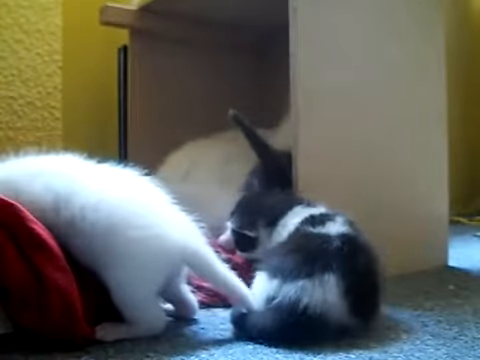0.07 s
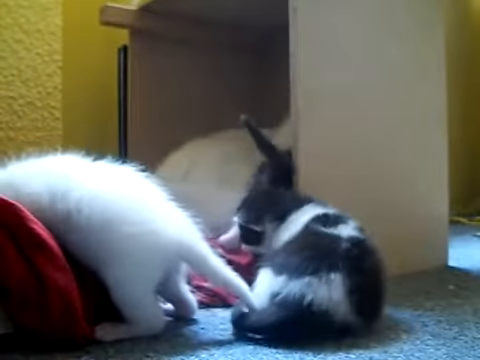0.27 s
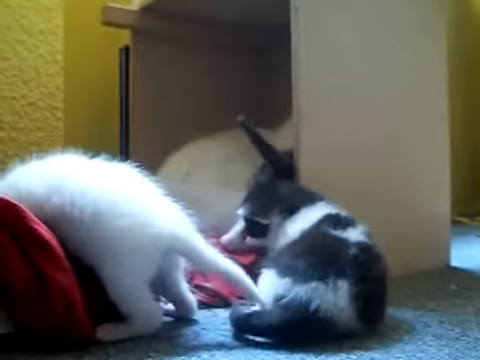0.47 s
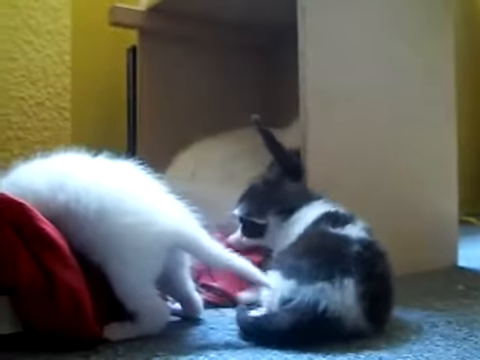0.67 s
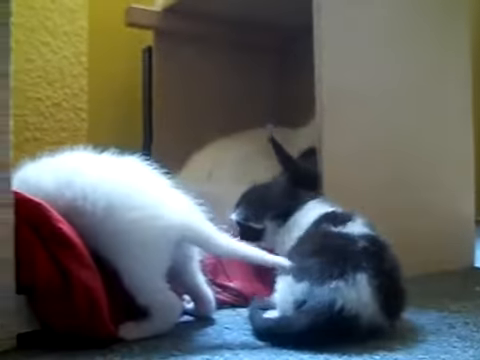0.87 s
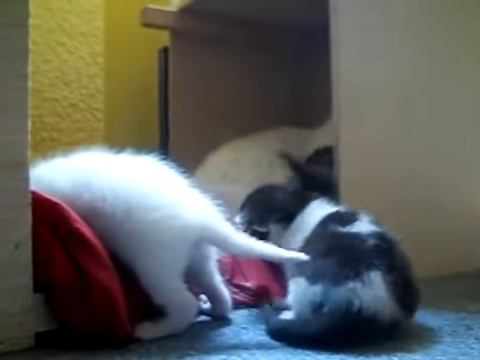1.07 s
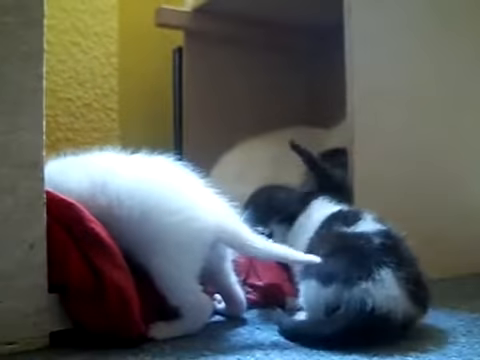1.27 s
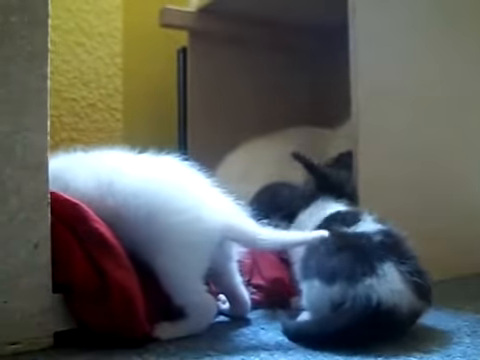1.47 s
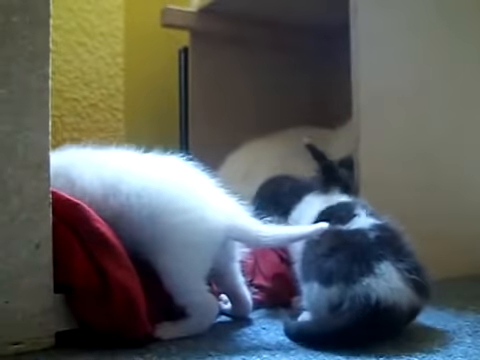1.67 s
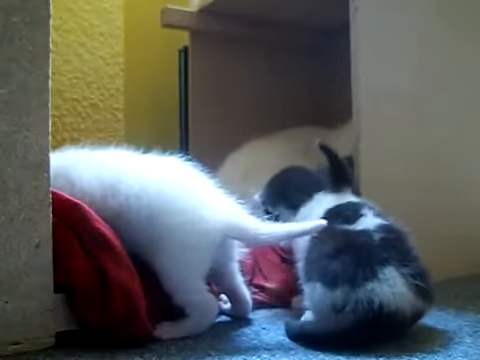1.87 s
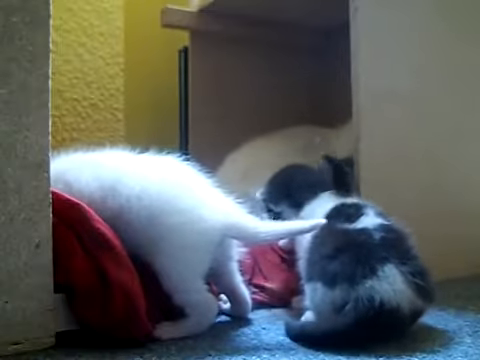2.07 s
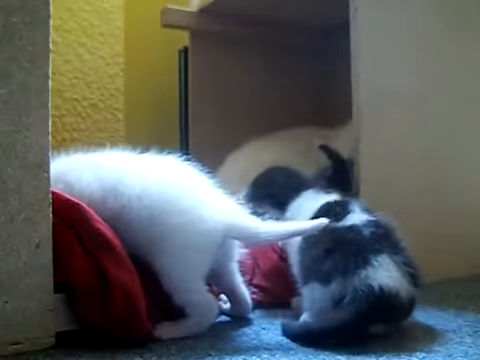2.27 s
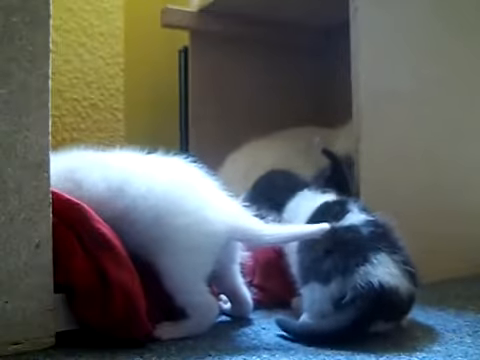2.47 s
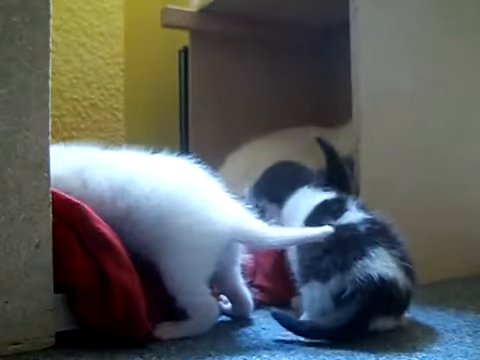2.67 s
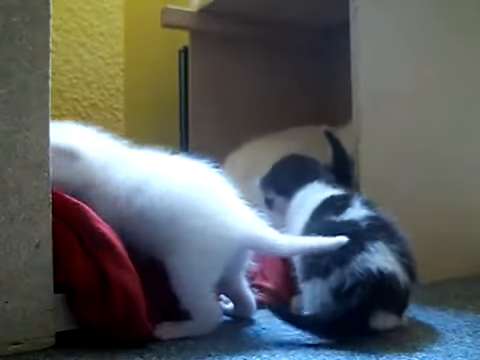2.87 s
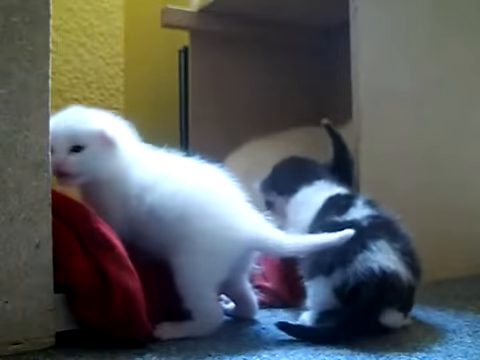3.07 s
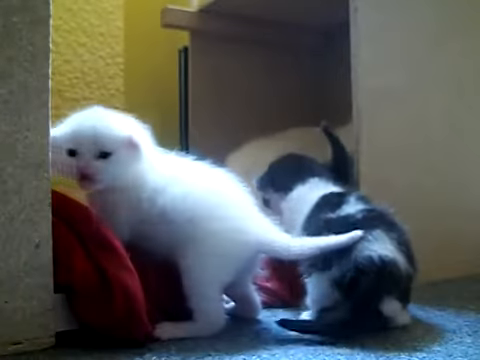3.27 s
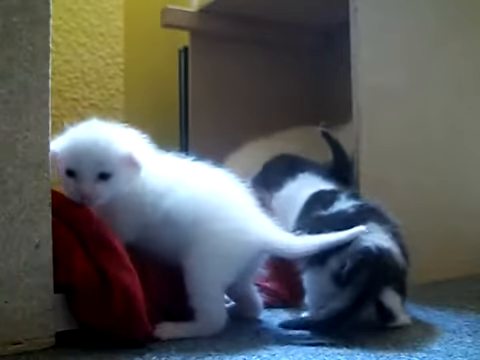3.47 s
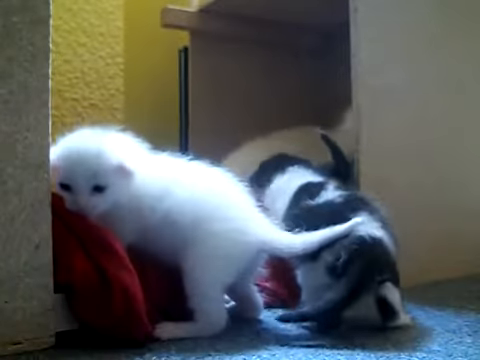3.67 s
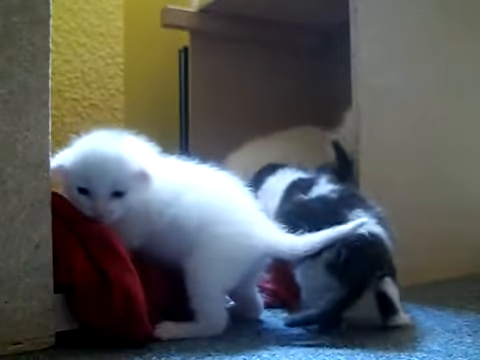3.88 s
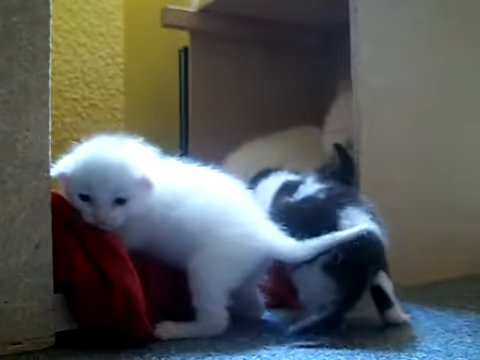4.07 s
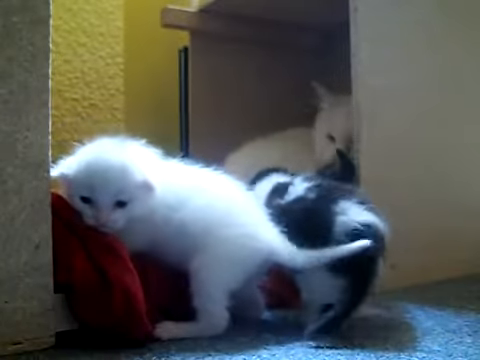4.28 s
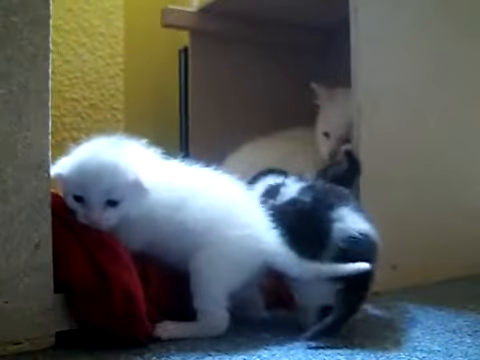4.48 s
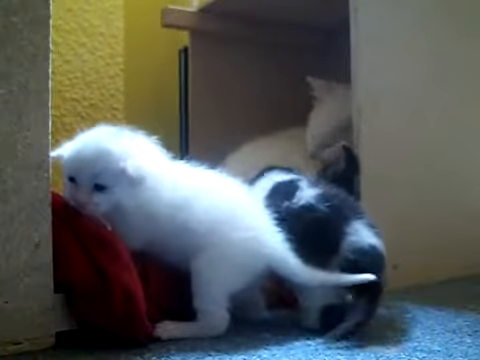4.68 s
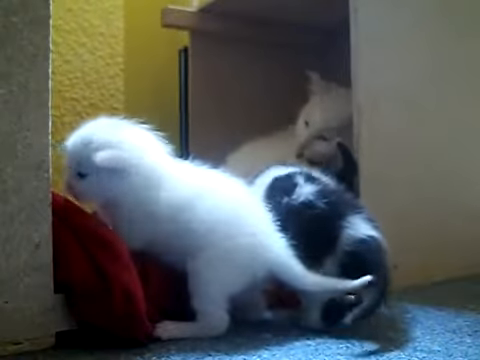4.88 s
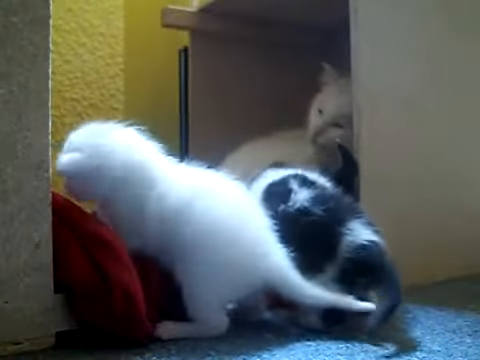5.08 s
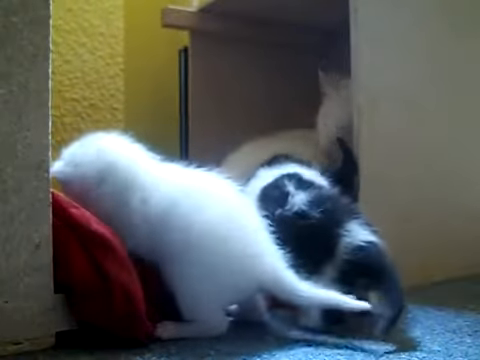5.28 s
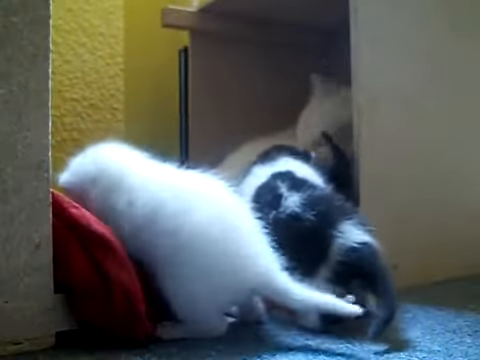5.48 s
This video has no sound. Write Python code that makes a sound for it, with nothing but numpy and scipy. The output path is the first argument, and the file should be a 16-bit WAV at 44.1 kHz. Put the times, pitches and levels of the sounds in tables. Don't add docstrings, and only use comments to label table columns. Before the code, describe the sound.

A small, dull-sounding microphone picks up kittens in a carpeted room with a short reverb. Steady hiss and an uneven low rumble run throughout, with soft handling thuds. From 0 to 1.7 s, cloth and carpet rustle in brushing strokes, with small ticks near 0.35 s and a dry snap with a thump at 0.59 s. At 1.48 s a sharp cluster of claw clicks, the loudest contact, coincides with a hoarse chirrup that climbs into a thin squeal until 1.93 s. Light ticks, scuffs and brief rustles follow from 2.05 to 2.8 s, with a barely audible peep at 2.5 s. From 2.96 to 3.64 s the main mew rises, clears, holds high and falls; a lower, rougher mew overlaps it from 3.2 to 3.5 s, and a click closes it. Then it is quiet until a small scuff at 4.64 s, a faint peep at 4.7 s and a weak low mew gliding upward from 5.1 s to the end.

```python
import sys
import numpy as np
from scipy import signal
from scipy.fft import rfft, irfft, next_fast_len
from scipy.io import wavfile
from scipy.ndimage import uniform_filter1d

SR = 44100
rng = np.random.default_rng(int(sys.argv[2]) if len(sys.argv) > 2 else 0)


def volts_from_db(level):
    exponent = np.asarray(level, float) / 20
    return 10 ** exponent


def unload_wav(signal):
    wavfile.write(
        sys.argv[1],
        SR,
        np.round(np.clip(np.atleast_2d(signal).T, -1, 1) * 32767).astype(np.int16),
    )


N = 243851
LOW_RATE_HZ = 12000

# frequency in Hz, level in dB per Hz.
HISS_TOP = [(5200, -29), (5500, -32), (5700, -36), (5860, -40), (5990, -43)]


def rms_one(x):
    return x / np.sqrt(np.mean(x ** 2) + 1e-20)


def in_time(rows, fade=0.008):
    s, *columns = np.transpose(rows)
    t = np.arange(N) / SR
    gate = np.clip(np.minimum(t - s[0], s[-1] - t) / fade + 0.5, 0, 1)
    return gate, [np.interp(t, s, column) for column in columns]


def swell(s, rise_s, fall_s):
    t = np.arange(N) / SR - s
    quarter = np.clip(np.where(t < 0, t / rise_s, t / fall_s), -1, 1)
    return np.cos(np.pi / 2 * quarter) ** 2


def drift(rate, size=N):
    r = np.exp(-2 * np.pi * rate / SR)
    lead_in = SR // 2
    noise = rng.standard_normal(size + lead_in)
    return rms_one(signal.lfilter([1], [1, -2 * r, r * r], noise)[lead_in:])


def coloured(x, points, lag=0):
    size = next_fast_len(N + 4096)
    hz = np.arange(size // 2 + 1) * SR / size
    points = np.array(points)
    gain = volts_from_db(np.interp(np.log(hz + 1), np.log(points[:, 0]), points[:, 1]))
    delay = np.exp(-2j * np.pi * hz * lag / SR)
    return irfft(rfft(x, size) * gain * delay, size)[..., :N]


def resonance(x, hz, width_hz):
    r = np.exp(-np.pi * width_hz / SR)
    poles = [1, -2 * r * np.cos(2 * np.pi * hz / SR), r * r]
    return signal.lfilter([(1 - r * r) / 2, 0, (r * r - 1) / 2], poles, x)


def hiss():
    # frequency in Hz, level in dB per Hz.
    floor_colour = [(59, -32.5), (100, -17.5), (135, -3), (329, -7), (408, -8.5), (703, -12), (2060, -16),
                    (2430, -15.5), (4130, -18), (5200, -30.5), (6760, -60), (11400, -120)]
    floor = rms_one(coloured(rng.standard_normal(N), list(floor_colour[:-3]) + list(HISS_TOP)))
    return volts_from_db(-58 + 0.8 * drift(2.4)) * floor


def steady(x):
    return x / np.sqrt(uniform_filter1d(x ** 2, size=8000) + 1e-20)


def rumble():
    # time in seconds, level in dB.
    traffic = [(0.0, -62.5), (0.44, -51), (0.63, -73), (0.72, -59), (1.08, -54), (1.15, -67), (1.52, -51.5),
               (1.59, -65), (1.63, -55), (2.11, -64.5), (2.45, -53), (2.94, -64), (3.48, -48.5),
               (3.99, -49.5), (4.43, -65), (4.7, -49.5), (5.5, -61.5), (5.53, -49.5)]
    # peak in seconds, length in seconds, thud in dB, boom in dB.
    bumps = [(0.138, 0.12, -56, -79), (0.352, 0.42, -78, -54), (0.758, 0.23, -48.5, -52.5),
             (0.919, 0.12, -52.5, -53.5), (1.128, 0.1, -61, -56.5), (1.269, 0.097, -56, -60.5),
             (1.502, 0.042, -44.5, -50.5), (2.063, 0.62, -70.5, -58.5), (2.373, 0.17, -70, -70),
             (3.41, 0.26, -56, -63.5), (3.685, .3, -53.5, -76.5), (4.1, 0.36, -61, -70.5),
             (4.885, 0.63, -66, -62.5), (5.52, 0.09, -66, -60.5)]
    thud_floor_db, boom_floor_db = -62, -63
    drone_hz, boom_hz = 56.4, 83.1

    _, (drone_db,) = in_time(traffic)
    humps = np.array([swell(s, length / 2, length / 2) for s, length, *_ in bumps])
    bump_gains = volts_from_db(np.array(bumps)[:, 2:].T) @ humps
    thud_gain, boom_gain = bump_gains + volts_from_db([[thud_floor_db], [boom_floor_db]])

    white = rng.standard_normal((3, N + SR))
    slow_band = signal.butter(2, [14, 31], "band", fs=SR, output="sos")
    thud = signal.sosfilt(slow_band, white[0])[SR:]
    drone = resonance(resonance(white[1], drone_hz, 5), drone_hz, 8)[SR:]
    boom = resonance(resonance(white[2], boom_hz, 37), boom_hz, 21)[SR:]
    return thud_gain * steady(thud) + volts_from_db(drone_db) * steady(drone) + boom_gain * steady(boom)


def shelf_hum():
    # frequency in Hz, width in Hz, level in dB.
    hz, width_hz, hum_db = (324, 25, -70)
    return rms_one(resonance(rng.standard_normal(N), hz, width_hz)) * volts_from_db(hum_db + 2 * drift(9.1))


def rustle():
    # peak in seconds, rise in seconds, fall in seconds, fibres in dB, drag in dB.
    strokes = [(.345, 0.16, .1, -60, -61.5), (0.601, 0.16, .12, -64, -57), (0.962, 0.28, 0.18, -54, -54),
               (1.09, 0.043, 0.093, -58.5, -66), (1.21, 0.29, 0.31, -58.5, -52.5),
               (1.456, 0.029, 0.059, -55, -55), (1.651, 0.088, 0.12, -55, -60.5),
               (2.07, 0.046, 0.03, -60.5, -62), (2.43, 0.052, .06, -62.5, -60),
               (4.72, 0.13, 0.38, -69, -74.5), (4.96, 0.17, 0.19, -84, -64), (5.125, 0.06, 0.08, -64, -65)]
    # frequency in Hz, level in dB per Hz.
    fibre_colour = [(530, -20.5), (900, -6.5), (1200, -2.5), (1340, 3.5), (1460, 4), (4420, 3), (5600, -35),
                    (7280, -51.5), (12300, -120)]
    # frequency in Hz, level in dB per Hz.
    drag_colour = [(71, -46), (120, -1), (290, -3), (330, 3), (464, -1.5), (1100, -8.5), (1430, -30.5),
                   (2420, -120)]

    snaps_per_s = 900 * volts_from_db(3 * drift(20))
    snap_size = volts_from_db(1.9 * np.minimum(rng.exponential(1, N), 4))
    snaps = (rng.random(N) < snaps_per_s / SR) * snap_size * rng.choice([-1, 1], N)
    friction = 0.33 * rms_one(snaps) + 0.83 * rng.standard_normal(N)
    fibre_top = [(hz, db + 17) for hz, db in HISS_TOP]
    bright = rms_one(coloured(friction, list(fibre_colour[:-3]) + fibre_top))
    dull = rms_one(coloured(friction, drag_colour))
    out = np.zeros(N)
    for s, rise_s, fall_s, bright_db, dull_db in strokes:
        out += swell(s, rise_s, fall_s) * (volts_from_db(bright_db) * bright + volts_from_db(dull_db) * dull)
    return volts_from_db(0.7 * drift(9.1)) * out


def ticks():
    # start in seconds, peak in dB, centre in Hz.
    claws = [(.297, -49, 4090), (.367, -39.5, 4770), (1.3695, -47, 3120), (1.4757, -30.5, 4340),
             (1.481, -27.5, 4010), (1.4835, -30.5, 4780), (1.4871, -31, 4500), (1.4908, -30, 5290),
             (2.2438, -34.5, 4100), (2.246, -48.5, 3930), (2.056, -48, 4880), (2.645, -44, 3200),
             (5.031, -51, 3100)]
    # start in seconds, peak in dB, centre in Hz.
    dry_snaps = [(0.341, -45.5, 1800), (0.5882, -32, 3770), (0.5868, -33, 1870), (0.587, -40.5, 1355),
                 (1.413, -36, 3540), (1.441, -41.5, 3530), (1.86, -42.5, 2620), (2.057, -41, 1770),
                 (2.646, -47, 1800), (4.64, -50.5, 1000), (2.084, -56, 1200), (2.386, -48, 2150),
                 (2.413, -44.5, 2280), (2.427, -49, 2500)]
    # start in seconds, peak in dB, centre in Hz.
    scuffs = [(.588, -48, 820), (1.619, -44, 1000), (2.069, -49, 1670), (2.257, -46, 4240),
              (2.474, -48, 4150), (2.505, -48.5, 4280), (2.7, -47, 3470), (4.72, -48.5, 3820),
              (4.77, -49.5, 3810), (2.738, -47.5, 3200), (1.484, -48.5, 190), (3.185, -55, 3360),
              (3.633, -48, 1270), (3.647, -38.5, 4430), (4.6377, -43, 3780), (4.642, -50, 1580)]
    # width as a share of the centre, decay by 60 dB in seconds.
    kinds = [
        (0.21, 0.038),
        (0.89, .008),
        (.4, .08),
    ]
    # start in seconds, peak in dB.
    thumps = [(0.276, -47), (.34, -51), (0.5859, -35), (1.4448, -42), (1.483, -57), (1.4919, -49),
              (2.058, -53), (2.085, -43), (2.649, -48), (2.738, -45.5), (2.768, -64), (4.643, -53)]
    # frequency in Hz, gain in dB.
    contact_colour = [(2500, 0), (4500, -8), (5200, -18), (5900, -32)]
    thump_hz, thump_t60_s = 340, 0.03

    size = 4400
    out, t = np.zeros(N), np.arange(size) / SR
    for rows, (share, t60_s) in zip([claws, dry_snaps, scuffs], kinds):
        for s, peak_db, hz in rows:
            puff = rng.standard_normal(size) * volts_from_db(-60 * t / max(t60_s, 0.002))
            band = resonance(resonance(puff, hz, share * hz), hz, share * hz)
            out[round(s * SR):][:size] += volts_from_db(peak_db) * band / np.abs(band).max()
    for s, peak_db in thumps:
        decay = volts_from_db(peak_db - 60 * t / thump_t60_s)
        out[round(s * SR):][:size] += decay * np.sin(2 * np.pi * thump_hz * t)
    return coloured(out, contact_colour)


def room(x):
    t60_s = 0.18
    t = np.arange(round(0.4 * SR)) / SR
    tail = rng.standard_normal(len(t)) * volts_from_db(-60 * t / t60_s) * (t > 0.004)
    return signal.fftconvolve(x, tail / np.sqrt(np.sum(tail ** 2)))[:N]


def mew(rows, throat_db, hoarse, closing_db=0):
    throat_hz = [1600, 2300, 3000, 3500, 4200, 5500]
    # frequency in Hz, level in dB.
    breath_colour = [(1200, -37), (2300, -0.5), (3200, 7), (4500, -7.5), (5600, -25)]
    overtone_slope_db = -5.5
    fifth_db = -8.5
    breath_db = -14

    gate, curves = in_time(rows)
    start = round(rows[0][0] * SR)
    span = slice(start - 1000, start + 33000)
    pitch, voice_db, opening_db = (curve[span] for curve in curves)
    size = len(pitch)
    t = np.arange(size) / SR

    def shake(rate):
        return drift(rate, size=34000)[:size]

    onset, settled, settle_s = hoarse
    rough = settled + (onset - settled) * np.exp(-(t / settle_s) ** 2)
    jitter = 0.003 * shake(40) + 0.032 * rough * shake(150)
    phase = 2 * np.pi * np.cumsum(pitch * (1 + jitter)) / SR

    progress = np.minimum(t / (rows[-1][0] - rows[0][0]), 1)
    slope_db = overtone_slope_db + closing_db * progress ** 5
    levels_db = [voice_db]
    for k in range(4):
        throat = np.interp(np.log((k + 2) * pitch), np.log(throat_hz), throat_db)
        levels_db.append(voice_db + opening_db + slope_db * k + fifth_db * (k == 3) + throat)

    breath = rms_one(coloured(rng.standard_normal(N), breath_colour))[span]
    voice = volts_from_db(breath_db + (levels_db[1] + levels_db[2]) / 2) * (0.5 + 2.7 * rough) * breath
    for k, level_db in enumerate(levels_db, 1):
        flutter = volts_from_db((1 + 7 * rough) * np.tanh(shake(35)) - 3 * rough)
        flutter += (0.5 * rough + 0.04 * k) * shake(300)
        audible = uniform_filter1d(1.0 * (k * pitch < LOW_RATE_HZ / 2), size=200)
        voice += np.sqrt(2) * volts_from_db(level_db) * flutter * audible * np.sin(k * phase)
    gate[span] *= voice
    return gate


def calls():
    # time in seconds, pitch in Hz, fundamental in dB, mouth opening as overtones over it in dB.
    chirrup = [(1.49, 1000, -56, -4), (1.52, 1020, -62, -4), (1.535, 1120, -63, -8), (1.55, 1180, -63, 0),
               (1.568, 1215, -61, 2), (1.588, 1218, -66, 7), (1.6, 1222, -73, 13)]
    squeal = [(1.604, 1286, -67.5, 12.5), (1.632, 1490, -67.5, 17.5), (1.647, 1602, -64.5, 4.5),
              (1.66, 1780, -70, 14.5), (1.692, 1913, -56.5, 0.5), (1.749, 1960, -52, -8.5),
              (1.878, 1904, -54.5, -7), (1.916, 1874, -49.5, -11), (1.931, 1824, -57, 6.5)]
    long_mew = [(2.962, 852.4, -62, 5.5), (3.025, 950, -57, 0), (3.099, 1297, -51, 0.5),
                (3.165, 1457, -46.5, -11), (3.252, 1436, -42, -20), (3.274, 1389, -39, -19.5),
                (3.499, 1306, -40, -17), (3.58, 1187, -43.5, -18), (3.641, 995, -51, -9)]
    answer = [(3.181, 791, -52.5, -1), (3.199, 834.3, -54, 3.5), (3.209, 1015, -53, -7.5),
              (3.258, 1007, -54, -2), (3.335, 995, -64, 2.5), (3.393, 1097, -51.5, -0.5),
              (3.464, 1120, -51.5, -5), (3.494, 1053, -54.5, -5.5), (3.519, 1173, -65, -3)]
    low_mew = [(5.085, 320, -64, -6), (5.125, 500, -55, -10), (5.168, 540, -55, -8), (5.21, 593, -57, -1),
               (5.24, 712, -61, 2), (5.281, 773, -58, 0), (5.345, 807, -59, -3), (5.475, 757, -59, -1),
               (5.529, 620, -61, 2)]
    throats = [
        (0, -1, 0, 6, 2, 2),
        (0, 0, 2, -2, -5, -18),
        (0, 0, 0, 0, 2, 5),
        (5, -2, 12, 2, 0, -20),
        (0, -2.5, -6, -22, -30, -40),
    ]
    # roughness 0-1 at the start, once settled, settling in seconds.
    hoarseness = [
        (.7, .3, .06),
        (.6, .1, .1),
        (.75, .07, .14),
        (.7, .4, .03),
        (.7, .15, .15),
    ]
    closings_db = [4, -11, 2, -30.5, -1]
    # centre in seconds, length in seconds, gain in
    # dB.
    catches = [(1.519, 0.026, 2.5), (1.728, 0.05, -10.5), (1.831, 0.025, -10), (3.055, 0.087, -7),
               (5.152, 0.023, -3), (5.476, 0.045, -8.5)]
    # start in seconds, pitch in Hz, level in dB, length in seconds.
    peeps = [
        (4.718, 1510, -61, .065),
        (2.522, 1555, -62, .04),
    ]
    sag, fade_db, opening_db, peep_rough = 0.05, -10.5, -21.5, 0.71

    full = sum(map(mew, [chirrup, squeal, long_mew, answer, low_mew], throats, hoarseness, closings_db))
    catches_db = sum(gain_db * swell(s, length / 2, length / 2) for s, length, gain_db in catches)
    out = volts_from_db(catches_db) * full
    for s, hz, db, length in peeps:
        glide = [(s, hz, db, opening_db), (s + length, hz * (1 - sag), db + fade_db, opening_db)]
        out += mew(glide, throats[-1], (peep_rough, peep_rough, 1))
    return out


def scene():
    near = calls() + ticks()
    reverberant = volts_from_db(-14) * room(near)
    mono = near + reverberant + rustle() + rumble() + shelf_hum() + hiss()
    return np.array([mono, mono])


def roll_off(x):
    return signal.sosfilt(signal.butter(12, 7330, fs=SR, output="sos"), x)


def record(dry):
    # frequency in Hz, gain in dB.
    treble_lift = [(300, 0), (1500, .7), (2500, 2), (3500, 4.3), (4500, 8.3), (5200, 13), (5600, 16),
                   (5950, 16)]
    # frequency in Hz, gain in dB.
    image = [(6000, 0), (6150, -3), (6320, -7), (6500, -11), (6830, -17), (7200, -26), (7400, -36),
             (7600, -48)]
    # frequency in Hz, gain in dB.
    side_kept = [(30, -17.5), (80, -12.5), (170, -5.5), (300, 0)]

    own = volts_from_db(-36.5) * np.array([hiss(), hiss()])
    taken = coloured(dry + coloured(own, [(400, -6.5), (1500, -21.5)]), treble_lift)
    taken = coloured(taken, [(LOW_RATE_HZ / 2 - 10, 0), (LOW_RATE_HZ / 2, -90)])
    mirror = 2 * taken * np.cos(2 * np.pi * LOW_RATE_HZ * np.arange(N) / SR)
    left, right = taken + coloured(mirror, list(image) + [(9000, -120)])
    left = coloured(left, [(20, 0), (20000, 0)], lag=SR / LOW_RATE_HZ)
    mid, side = (left + right) / 2, coloured((left - right) / 2, side_kept)

    top = coloured(mid, [(5600, -60), (5750, 0)])
    top_db = 10 * np.log10(uniform_filter1d(top ** 2, size=1024) + 1e-20)
    strong = 0.3 * (top_db - np.median(top_db)) + 3 * drift(14) > 0
    kept = uniform_filter1d(1.0 * strong, size=500)
    mid = mid - 0.97 * (1 - kept) * top
    return roll_off(np.array([mid + side, mid - side]))


dry = scene()
out = record(dry)
unload_wav(out)
```